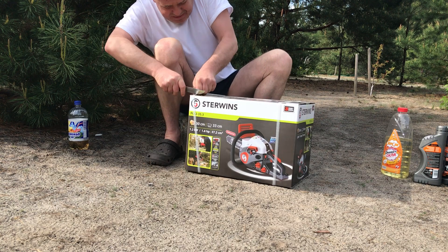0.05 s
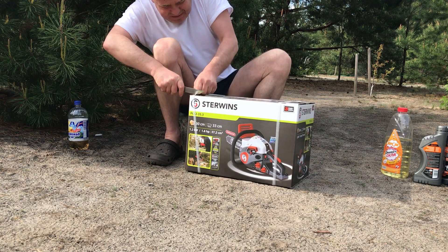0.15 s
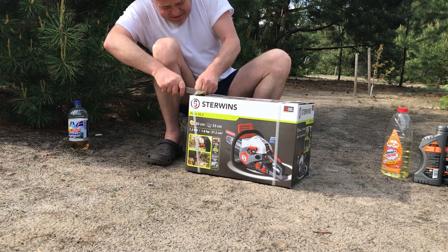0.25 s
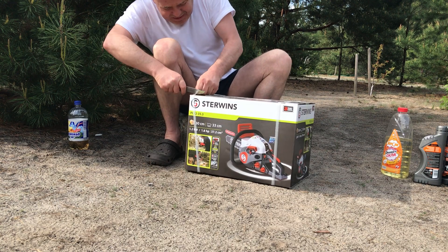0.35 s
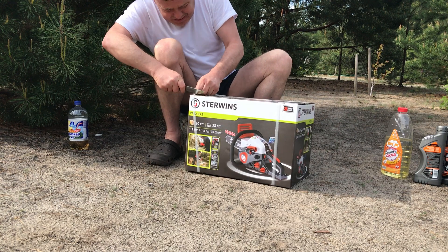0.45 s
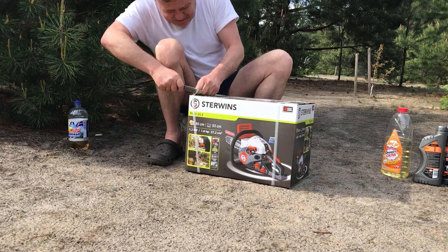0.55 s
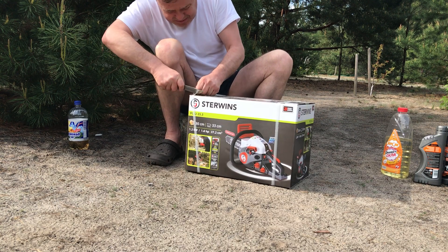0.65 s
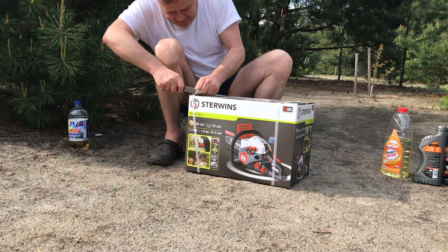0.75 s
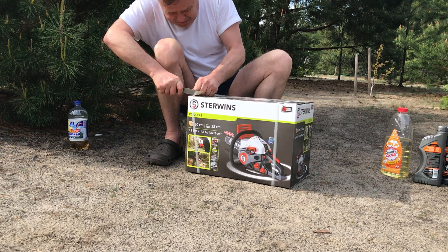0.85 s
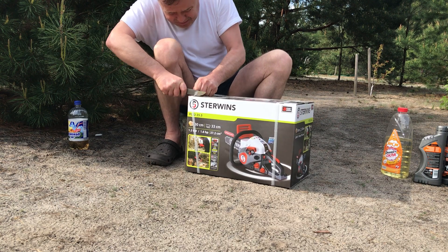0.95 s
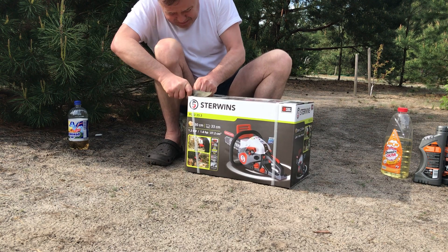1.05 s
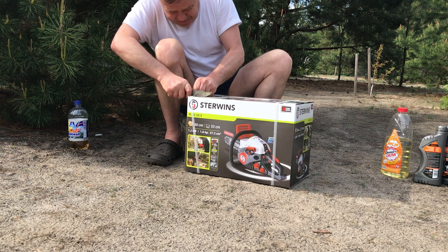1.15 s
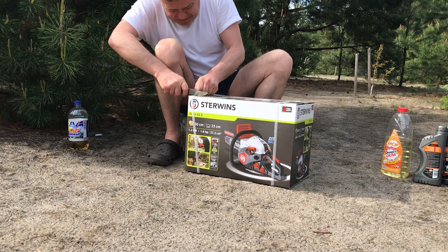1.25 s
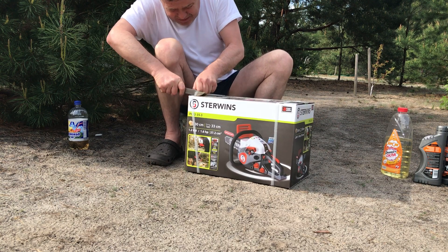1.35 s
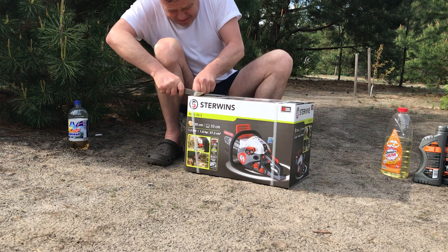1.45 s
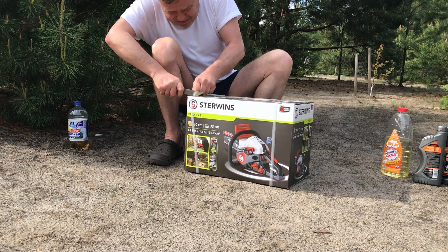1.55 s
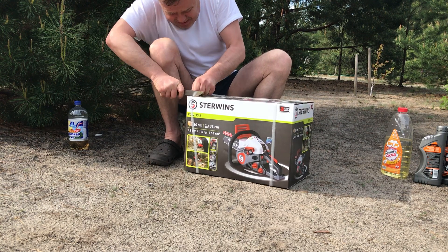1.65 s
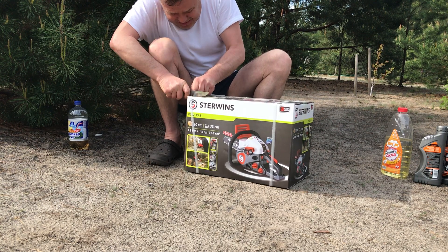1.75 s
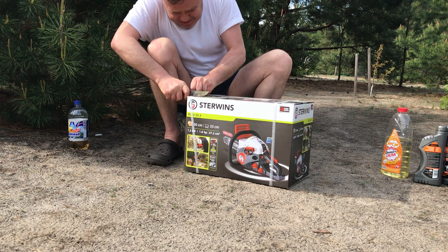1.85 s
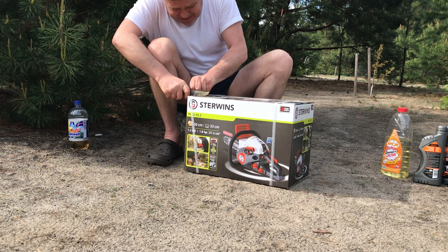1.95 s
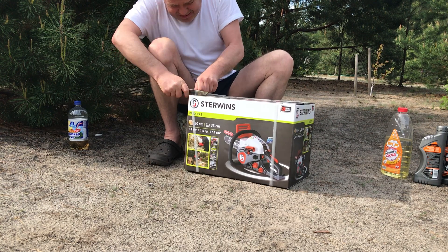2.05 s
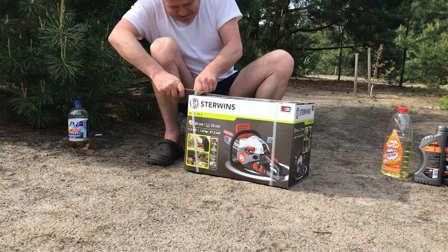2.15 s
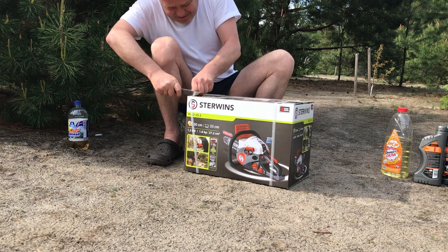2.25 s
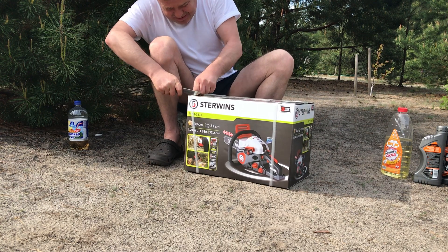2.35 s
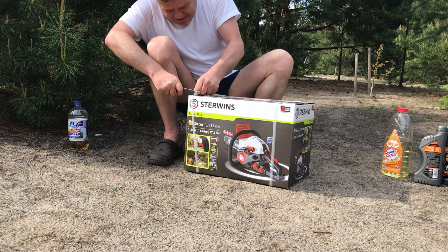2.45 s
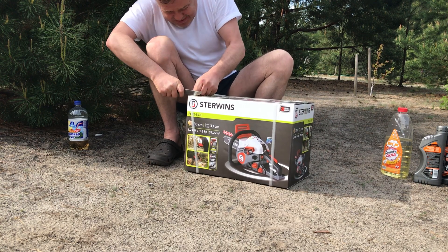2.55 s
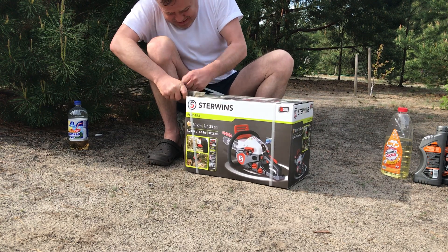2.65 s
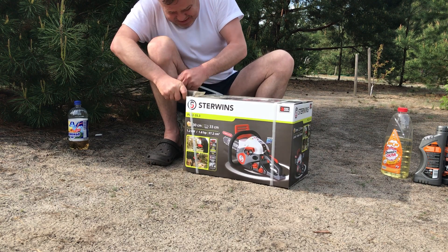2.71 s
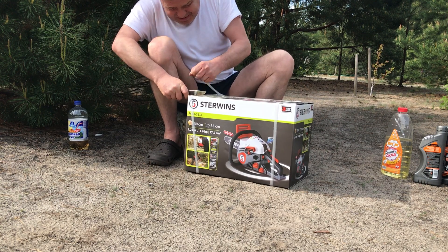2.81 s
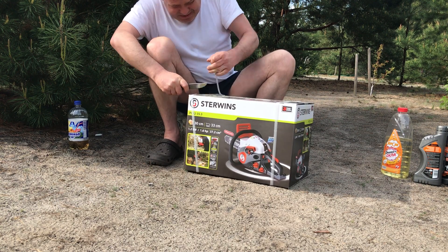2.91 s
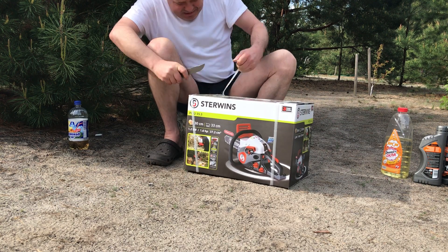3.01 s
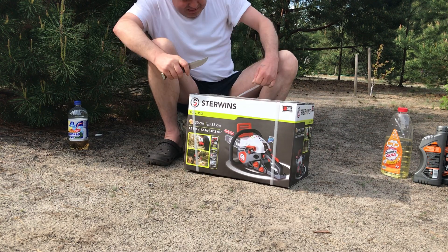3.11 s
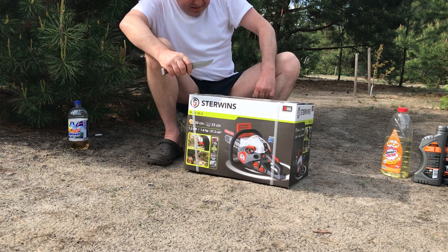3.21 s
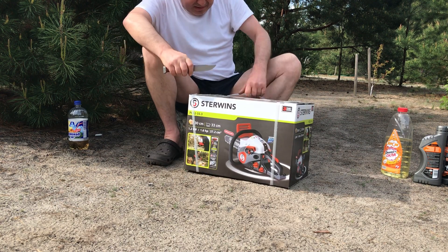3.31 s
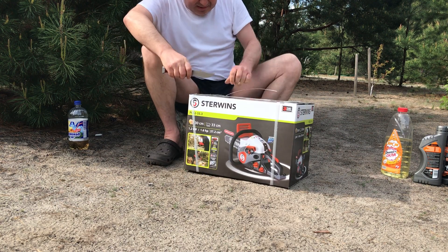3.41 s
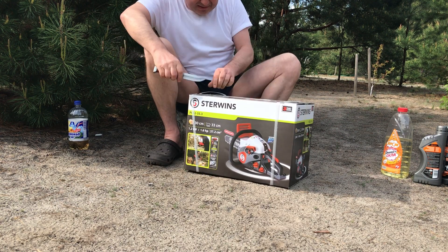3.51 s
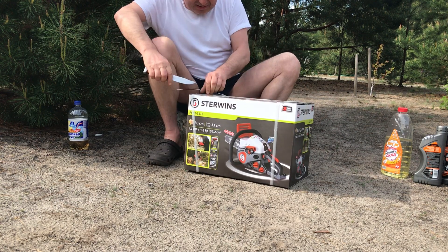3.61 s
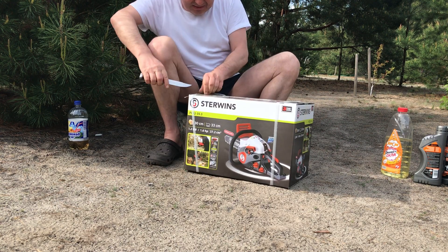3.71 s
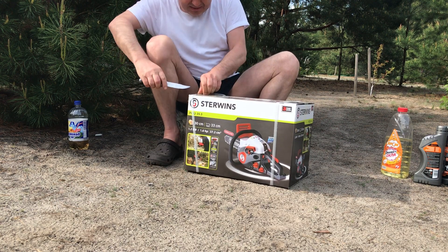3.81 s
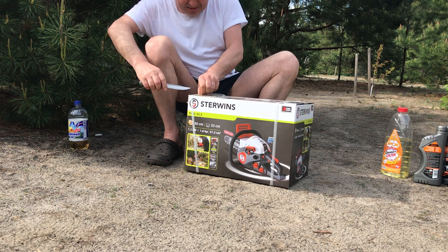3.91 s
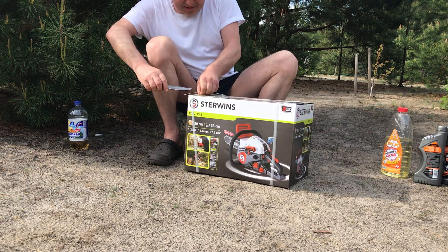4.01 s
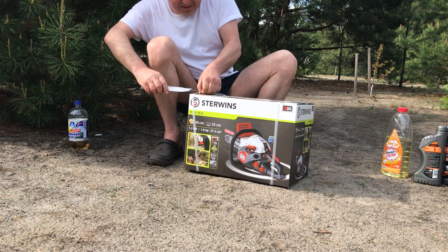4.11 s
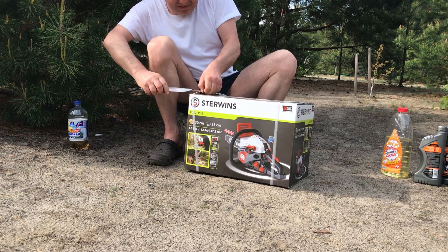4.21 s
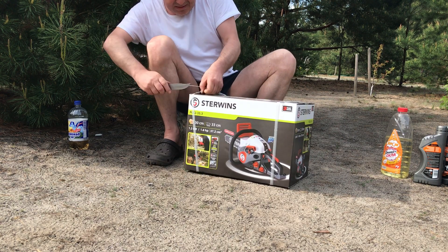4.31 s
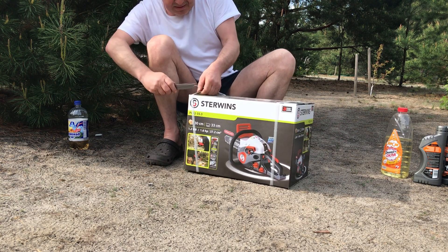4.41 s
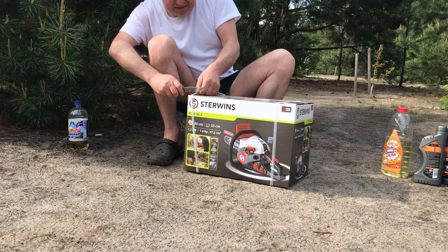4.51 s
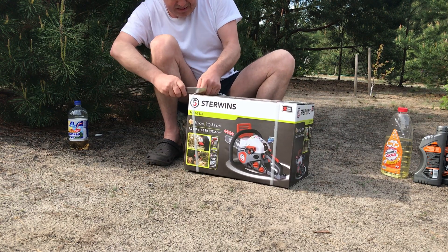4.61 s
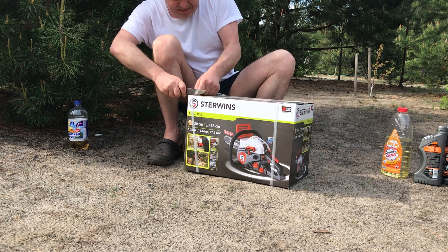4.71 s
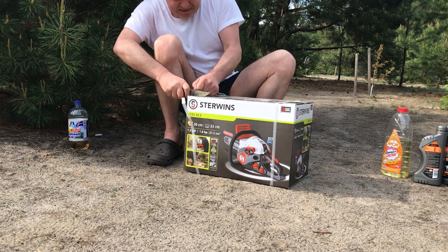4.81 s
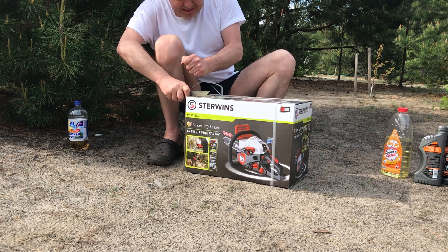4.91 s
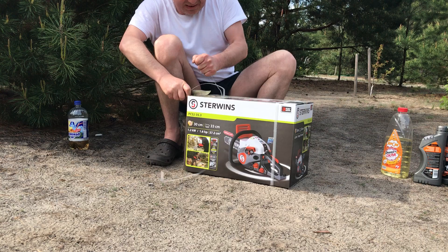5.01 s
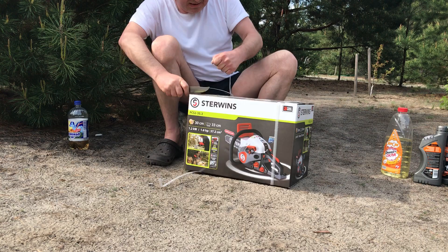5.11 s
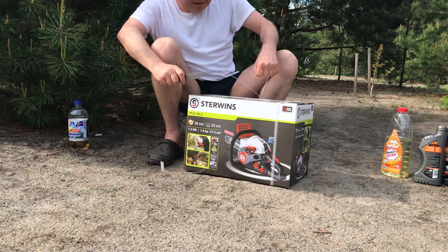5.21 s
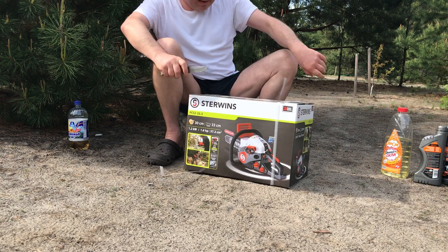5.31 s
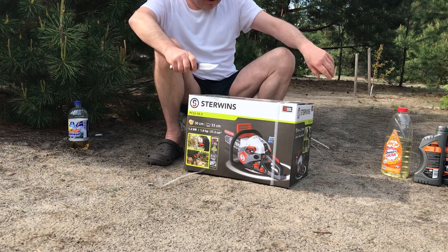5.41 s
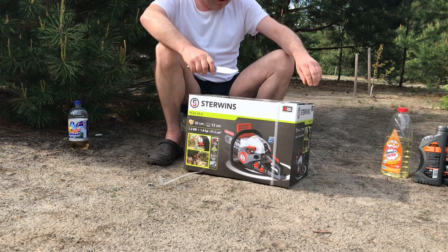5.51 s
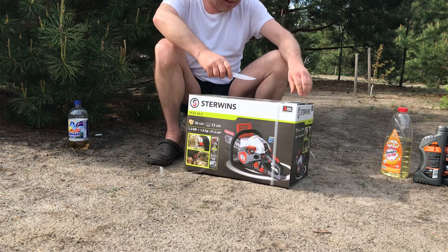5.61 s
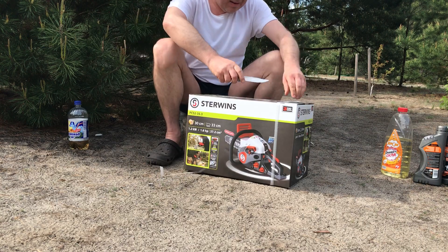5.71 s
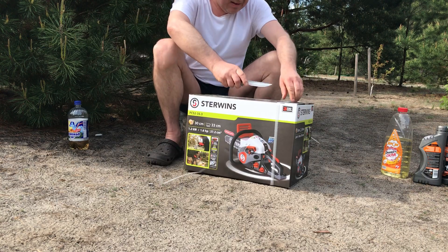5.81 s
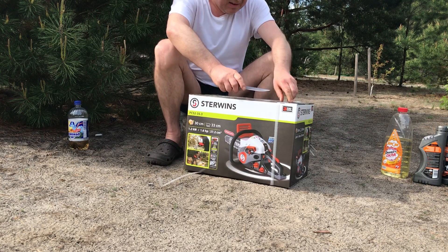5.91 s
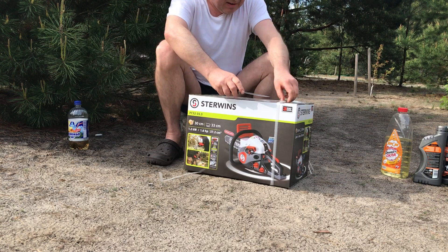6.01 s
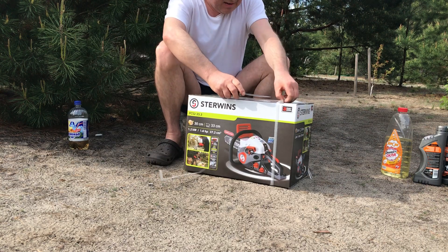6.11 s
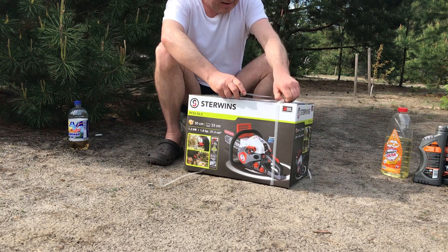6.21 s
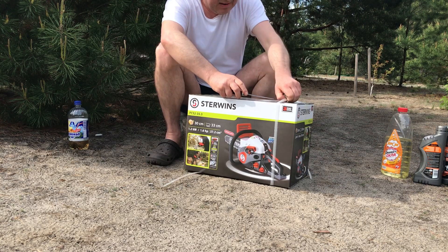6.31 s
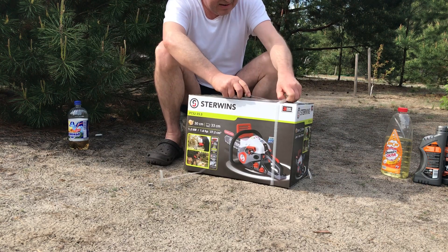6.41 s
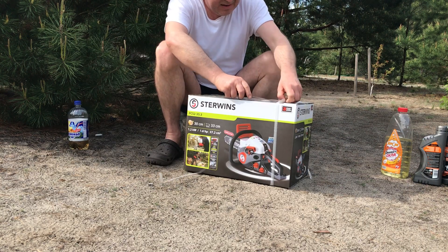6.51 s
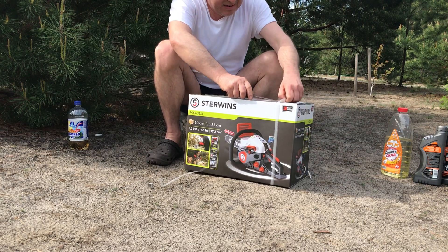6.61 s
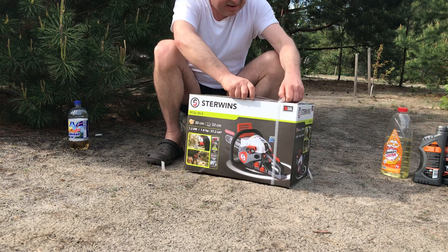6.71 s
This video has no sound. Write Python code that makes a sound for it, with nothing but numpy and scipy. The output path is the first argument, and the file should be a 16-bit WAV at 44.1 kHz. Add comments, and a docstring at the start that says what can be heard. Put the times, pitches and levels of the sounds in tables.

```python
"""A knife works under the plastic straps of a cardboard box outdoors, heard as short cracks loud and faint:
bursts of noise in card, strap and blade bands. Strap strokes scrape as rough noise with small slips.
The hollow box answers with dull knocks of decaying modes. Far off, an engine hums as narrow noise, birds
trill in falling whistles and faint narrow noises whisper. A rumble and a wash of shaped noise lie below,
and a brighter hiss rises for four stretches."""
import sys
import numpy as np
from scipy import signal
from scipy.fft import rfft, irfft
from scipy.io import wavfile
from scipy.ndimage import uniform_filter1d

SR = 44100
rng = np.random.default_rng(int(sys.argv[2]) if len(sys.argv) > 2 else 0)


def persist_wave(psi):
    """Save psi, clipped to +-1, as 16-bit WAV."""
    counts = np.round(np.clip(psi, -1, 1) * 32767).astype(np.int16)
    wavfile.write(sys.argv[1], SR, np.atleast_2d(counts).T)


N = 297675  # length in samples


def undb(db):
    """Turn decibels into an amplitude factor."""
    return 10 ** (np.asarray(db) / 20)


def unit(x):
    """Scale a signal to rms 1."""
    return x / np.sqrt(np.mean(x ** 2))


def band(x, lo_hz, hi_hz):
    """Band-pass with moderate skirts."""
    edges_hz = [lo_hz, min(hi_hz, .45 * SR)]
    return signal.sosfilt(signal.butter(2, edges_hz, "bandpass", fs=SR, output="sos"), x)


def band_noise(centre_hz, width_hz):
    """White noise narrowed to one band, at rms 1."""
    white = rng.standard_normal(N)
    return unit(band(white, centre_hz - width_hz / 2, centre_hz + width_hz / 2))


def coloured(points):
    """Noise of rms 1 whose spectrum follows (pitch_hz, level_db) points."""
    point_hz, point_db = np.transpose(points)
    hz = np.maximum(np.arange(N // 2 + 1) * SR / N, 1)
    colour_db = np.interp(np.log(hz), np.log(point_hz), point_db)
    return unit(irfft(rfft(rng.standard_normal(N)) * undb(colour_db), N))


def walk(rate):
    """Random levels drawn rate times a second and smoothed twice; rms 1."""
    hold = int(SR / rate)
    steps = np.repeat(rng.standard_normal(N // hold + 1), hold)
    return unit(uniform_filter1d(uniform_filter1d(steps, hold), hold)[:N])


def add(out, start_s, x):
    """Mix x into out from start_s."""
    i = int(start_s * SR)
    out[i:i + len(x)] += x[:len(out) - i]


WASH_DB = -64
# relative colour of the outdoor wash: pitch_hz [Hz], level_db [dB per Hz]
WASH_COLOUR = [(20, -25.5), (40, -9.5), (59, 0), (124, -6), (204, -9), (400, -18), (650, -25),
               (1350, -28.5), (2700, -29), (4200, -33), (6000, -34), (15500, -38.5)]


def wash():
    """Quiet outdoor air: shaped noise with a slight flutter in level."""
    return undb(WASH_DB + 0.25 * walk(36)) * coloured(WASH_COLOUR)


# level curve of the low rumble: time_s [s], level_db [dB]
RUMBLE_CURVE = [(0, -73), (.8, -82), (1.75, -71.5), (2.4, -80.5), (3.65, -74.5), (4.8, -70.5), (5.4, -76.5),
                (6.5, -58.5), (6.75, -61)]


def rumble():
    """Gusty low noise whose level drifts around a drawn curve."""
    level_db = np.interp(np.arange(N) / SR, *np.transpose(RUMBLE_CURVE))
    return undb(level_db + 1.6 * walk(3.3)) * band_noise(55, 40)


# tones of the far engine: pitch_hz [Hz], width_hz [Hz], level_db [dB]
ENGINE_TONES = [(55.4, 3.1, -74), (118, 15, -70.5)]


def engine():
    """Two narrow noise bands, each slowly wavering in level, make the hum."""
    out = np.zeros(N)
    for pitch_hz, width_hz, level_db in ENGINE_TONES:
        out += undb(level_db + 0.87 * walk(0.65)) * band_noise(pitch_hz, width_hz)
    return out


# stretches of louder hiss: start_s [s], end_s [s], level_db [dB]
HISS_STRETCHES = [(1.058, 1.547, -62.5), (1.789, 2.333, -64), (2.722, 3.566, -63.5), (4.946, 5.338, -63)]
# relative colour of that hiss: pitch_hz [Hz], level_db [dB per Hz]
HISS_COLOUR = [(120, -18.5), (200, -1), (530, -12.5), (900, -18.5), (4500, -19), (15800, -26)]


def loud_hiss():
    """Fluttering shaped noise that fades in and out quickly around each stretch."""
    t = np.arange(N) / SR
    flutter_db = 1.3 * walk(7) + 1.0 * walk(40)
    gain = np.zeros(N)
    for start_s, end_s, level_db in HISS_STRETCHES:
        gain += undb(level_db) * ((t > start_s) & (t < end_s))
    # 32 ms ramps
    return uniform_filter1d(gain, int(0.032 * SR)) * undb(flutter_db) * coloured(HISS_COLOUR)


# faint whispers, perhaps other birds: start_s [s], end_s [s], pitch_hz [Hz], width_hz [Hz], level_db [dB]
FAR_WHISPERS = [(5.66, 6.24, 2167, 450, -83), (5.85, 6.2, 3720, 349, -83), (6.638, 6.8, 5550, 150, -87)]


def whispers():
    """Narrow noise bands that swell, flutter and fade."""
    t = np.arange(N) / SR
    out = np.zeros(N)
    for start_s, end_s, pitch_hz, width_hz, level_db in FAR_WHISPERS:
        swell = np.sin(np.pi * np.clip((t - start_s) / (end_s - start_s), 0, 1)) ** .5
        out += undb(level_db + 2.0 * walk(40)) * swell * band_noise(pitch_hz, width_hz)
    return out


# each note falls to the end pitch from 0.55 to 1.05 times the fall above it
NOTE_END_HZ, NOTE_FALL_HZ = 3240, 560
# bird trills: start_s [s], rate_hz [notes per s], notes [count], level_db [dB, loudest note before flutter]
BIRD_TRILLS = [(.888, 47, 9, -75), (2.358, 46.5, 9, -66), (6.217, 51, 11, -68)]


def bird():
    """Quick falling whistles that swell and fade over each trill, blurred by echoes from the trees."""
    out = np.zeros(N)
    for start_s, rate_hz, notes, level_db in BIRD_TRILLS:
        place = np.arange(int(notes / rate_hz * SR)) * rate_hz / SR
        part = place % 1
        swell = np.sin(np.pi * (place / notes) ** .85)
        # louder notes start higher
        hz = NOTE_END_HZ + NOTE_FALL_HZ * (1 - part) ** 1.3 * (.55 + .5 * swell)
        note = np.sin(np.pi * part ** .7) ** .8
        whistle = np.sin(2 * np.pi * np.cumsum(hz) / SR)
        add(out, start_s, undb(level_db) * swell * note * whistle)
    t = np.arange(int(.2 * SR)) / SR
    trees = rng.standard_normal(len(t)) * undb(-37 - 60 * t / .4)
    flutter_db = 1.2 * walk(50)
    return out * undb(flutter_db) + signal.fftconvolve(out, trees)[:N]


# the box as a drum, before each knock varies it: pitch_hz [Hz], level_db [dB], t60_s [s]
BOX_MODES = [(85.6, -5, 0.085), (127.8, -1, 0.08), (181.4, -8.5, 0.058), (202.4, 1.5, 0.048),
             (265, -0.5, 0.05), (381.6, -5.5, 0.053), (510, 0.5, 0.029), (892, -14.5, 0.038)]
# blows on the box: start_s [s], peak_db [dB], centre_hz [Hz, favoured pitch], damping [times faster decay]
BOX_KNOCKS = [(0.576, -37, 80.7, 1.8), (0.578, -40.5, 510, 2), (0.622, -50.5, 130, 0.5),
              (0.828, -50, 270, 1.5), (1.08, -33.5, 192, 0.69), (1.128, -36, 185, 0.52),
              (1.195, -48, 104, 1.9), (1.793, -29, 202, 1.6), (1.835, -36, 250, 1.1),
              (1.901, -46, 222, 0.5), (2.131, -52, 133, 0.26), (2.705, -40, 266, 2),
              (2.716, -23.5, 240, 0.63), (2.74, -26.5, 127, 1.95), (2.771, -32, 209, 0.46),
              (2.841, -49, 207, 0.46), (3.082, -40.5, 230, 0.69), (3.116, -37, 383, 0.74),
              (3.147, -43.5, 240, 0.39), (3.224, -40.5, 170, 0.41), (3.256, -34, 455, 0.52),
              (3.464, -46, 139, 2.2), (3.552, -51, 272, 0.42), (3.745, -46, 160, 0.78),
              (4.257, -39, 315, 0.8), (4.462, -46.5, 277, 0.66), (4.49, -46.5, 192, 1.2),
              (4.678, -45.5, 108, 2), (4.931, -13, 210, 1.07), (5.0, -36.5, 94.5, 0.6),
              (5.039, -39, 80.7, 1.2), (5.895, -52, 151, 0.91), (6.003, -51, 400, 0.84),
              (6.024, -44.5, 186, 0.97), (6.181, -53, 200, .8), (6.35, -42.5, 188, 0.9),
              (6.394, -45, 157, 1.2), (6.51, -51, 141, 1), (6.58, -37.5, 222, 1.8), (6.598, -49, 217, 0.82)]


def knocks():
    """A blow rings the box modes; where it lands decides which modes are strong."""
    t = np.arange(int(.2 * SR)) / SR
    mode_hz, mode_db, t60_s = (c[:, None] for c in np.transpose(BOX_MODES))
    out = np.zeros(N)
    chance = rng.standard_normal((len(BOX_KNOCKS), 2, len(BOX_MODES), 1))
    for (start_s, peak_db, centre_hz, damping), (detune, scatter) in zip(BOX_KNOCKS, chance):
        # modes lose 7 dB per octave away from the favoured pitch
        weight_db = mode_db - 7 * np.abs(np.log2(mode_hz / centre_hz)) + 1.5 * scatter
        tuned_hz = mode_hz * (1 + .02 * detune)
        decay = undb(weight_db - 60 * t * damping / t60_s)
        rings = decay * np.sin(2 * np.pi * tuned_hz * t)
        # the panels take a cycle or so to get moving, so the lows come late
        attack = (1 - np.exp(-t * mode_hz / .9)) ** 2
        knock = np.sum(rings * attack, axis=0)
        add(out, start_s, undb(peak_db) * knock / np.max(np.abs(knock)))
    return out


# broad resonances of strap and lid: pitch_hz [Hz], width_hz [Hz], level_db [dB]
STRAP_RINGS = [(1275, 130, 7), (2200, 550, 6.5), (4050, 290, 2.5), (5800, 800, 5), (8036, 730, 6),
               (13300, 6300, 5)]


def ringing(x):
    """The sound plus what each resonance of strap and lid adds to it."""
    out = x.copy()
    for pitch_hz, width_hz, level_db in STRAP_RINGS:
        peak = signal.iirpeak(pitch_hz, pitch_hz / width_hz, fs=SR)
        out += (undb(level_db) - 1) * signal.lfilter(*peak, x)
    return out


# bands of card, strap and blade, in that order: low_hz [Hz], high_hz [Hz]
PART_BANDS = [(550, 1600), (1600, 5000), (5000, 15500)]


def radiated(grain_db):
    """Card, strap and blade each carry one band of ringing noise; all follow the same grain."""
    parts = []
    for low_hz, high_hz in PART_BANDS:
        grains = rng.standard_normal(N) * undb(grain_db)
        parts.append(unit(band(ringing(grains), low_hz, high_hz)))
    return np.array(parts)


STROKE_RISE, STROKE_FALL = .2, 0.41  # shares of the stroke
# strokes of strap over card: start_s [s], length_s [s], level_db [dB], treble_db [dB relative to level_db]
STROKES = [(.1, 0.58, -82.5, -9), (0.993, 0.082, -74.5, 3), (1.078, 0.094, -66.5, 4),
           (1.302, 0.14, -70.5, 0), (1.788, 0.11, -68.5, 7.5), (2.707, 0.056, -38.5, -1.5),
           (2.748, 0.077, -63.5, -3), (3.071, 0.13, -49, 1), (3.181, 0.12, -47.5, 2),
           (3.388, 0.1, -67.5, -4), (4.649, 0.034, -70.5, -1.5), (4.87, 0.1, -65.5, -11.5),
           (4.934, .04, -54, -8), (4.965, 0.097, -54.5, -7), (5.989, 0.091, -71, -9), (6.124, 0.13, -74, 1)]


def stroke(t):
    """Level and treble gains of the strokes at times t: each stroke rises, holds and falls."""
    start_s, length_s, level_db, treble_db = (c[:, None] for c in np.transpose(STROKES))
    place = (t - start_s) / length_s
    shape = np.clip(np.minimum(place / STROKE_RISE, (1 - place) / STROKE_FALL), 0, 1)
    gain = undb(level_db) * shape
    return gain.sum(axis=0), (gain * undb(treble_db)).sum(axis=0)


def drag():
    """A strap scrapes as dense stick-slip noise whose strength jumps from moment to moment."""
    level, treble = stroke(np.arange(N) / SR)
    card, strap, blade = radiated(2.0 * walk(300))
    return level * undb(-4.5) * (card + strap) + treble * blade


SLIPS_PER_S, SLIP_T60_MS = 150, 18
# card, strap and blade relative to the stroke, and their random spread
SLIP_DB, SLIP_SCATTER_DB = (-12.5, 1, 5), 4.5


def slips():
    """A sliding strap slips in small cracks at uneven moments; rows have the columns of BURSTS."""
    count = int(SLIPS_PER_S * N / SR)
    place, scatter = rng.random(count), rng.standard_normal((count, 3))
    time_s = (np.arange(count) + place) / SLIPS_PER_S
    level, treble = stroke(time_s)
    on = level > 0
    stroke_db = 20 * np.log10(np.transpose([level, level, treble])[on])
    parts_db = stroke_db + SLIP_DB + SLIP_SCATTER_DB * scatter[on]
    return [(s, *db, 0, SLIP_T60_MS) for s, db in zip(time_s[on], parts_db)]


BLADE_TOP_HZ = 10500  # the lift acts above this
# short noise bursts, loud and faint, some a soft lead-in just before a loud crack:
# time_s [s, 0.4 ms after the onset], card_db [dB], strap_db [dB], blade_db [dB],
# lift_db [dB, blade's top before levelling], t60_ms [ms, blade; at least 2 is used]
BURSTS = [(0.084, -53, -73, -60, 0, 6.9), (0.2496, -59, -71, -70, 0, 7.3), (0.5708, -61, -55, -53, 5, 49),
          (0.5776, -38.5, -34.5, -37, 11, 6.7), (0.6105, -72, -60.5, -55.5, 2, 52),
          (0.8307, -68, -45.5, -36, 6, 10.8), (0.869, -61, -72, -65, -4, 18),
          (0.9245, -56.5, -46.5, -33, 8.5, 14.6), (0.9504, -76, -57, -54, 0, 12),
          (0.975, -70, -60, -66, 0, 22), (1.078, -63, -52.5, -50, 4, 27),
          (1.0832, -35, -32.5, -20.5, -4, 15), (1.129, -40, -27, -21, 4.5, 15),
          (1.1375, -48, -35.5, -27, 5, 13), (1.213, -70, -61, -57, 0, 14),
          (1.2344, -66, -50.5, -62, -6, 13), (1.4856, -62, -55.5, -51, -14, 26),
          (1.7674, -49, -54, -39, -5, 17), (1.7755, -51, -54, -37, -1, 19),
          (1.7835, -34, -26.5, -20, -1, 12.4), (1.7931, -34.5, -27, -14, 11, 12.4),
          (1.8184, -49, -50, -32, 0, 8.7), (1.8318, -54, -42.5, -41, 0, 28),
          (1.8349, -31, -24.5, -13.5, 1.5, 9.2), (1.9031, -51, -29, -24.5, -6, 9.8),
          (1.9216, -61, -42.5, -39, -6, 16), (1.9364, -59, -47, -50, 11, 11),
          (1.952, -70, -52, -52, 15, 16), (1.9819, -67, -46, -45, 17, 6.4),
          (1.988, -76, -46.5, -43, 24, 10.5), (2.012, -65.5, -47.5, -51, 11, 11),
          (2.6831, -54, -48.5, -46.5, -1, 32), (2.694, -49, -47, -36.5, -1, 23.5),
          (2.7044, -32, -26.5, -22, 2, 13), (2.7154, -52, -17, -26, 2, 12.8),
          (2.7214, -39, -32, -19, -3, 11), (2.7236, -21, -17.5, -18, -1, 14),
          (2.7413, -40, -35, -33, 2, 19), (2.7557, -63, -38.5, -42, 6, 68),
          (2.7676, -43, -37, -30.5, 0, 19), (2.7717, -25.5, -34, -21.5, 0, 8),
          (2.776, -28.5, -29, -20, 9, 13.7), (2.7974, -34, -31, -30, 0, 9.9),
          (2.9033, -66, -48.5, -51, 2, 5), (3.0757, -46, -38, -35, 0, 26), (3.095, -59, -50, -40, 2, 7.5),
          (3.1, -40, -38, -33, -2, 7.9), (3.104, -37, -38, -34, -4, 14),
          (3.1166, -40, -36, -26.5, -5, 15.4), (3.1304, -57, -43, -33, 4, 20),
          (3.1457, -55, -47, -37, 0, 20), (3.149, -41, -39, -26.5, 0, 11), (3.1615, -57, -47, -29, -6, 26),
          (3.187, -65, -37, -27, -4, 19), (3.1968, -64, -36.5, -29.5, -10, 48),
          (3.2106, -57, -34.5, -30, 2, 34), (3.2151, -45, -48, -30, -3, 12),
          (3.2223, -50, -40, -29.5, 0, 43), (3.2396, -45, -42, -35, -2, 49),
          (3.2485, -34, -27.5, -29, -1, 12.5), (3.2607, -34, -35.5, -31, -3, 29),
          (3.2704, -56, -59, -32.5, -9, 18), (3.371, -56, -57.5, -52, -10, 31),
          (3.5543, -61, -54.5, -71, 0, 30), (3.6165, -62, -56.5, -56, 1.5, 24),
          (3.6382, -74, -70, -56, 3, 9), (3.991, -73.5, -76, -35.5, 8, 11),
          (4.0374, -67.5, -59.5, -56.5, -4.5, 31), (4.2464, -76, -42.5, -53, -1, 12.5),
          (4.2608, -48.5, -47, -43, 0, 25), (4.2922, -70, -62.5, -49.5, 4, 10.4),
          (4.4888, -55, -50, -32, -3, 11.7), (4.5406, -73, -54, -50, -0.5, 12),
          (4.5495, -68.5, -61.5, -58.5, 0, 23), (4.684, -67, -59.5, -59.5, -2, 13),
          (4.9293, -23.5, -22, -17, 2.5, 26), (4.9303, -25, -16.5, -20.5, 4, 13),
          (5.0034, -46, -62, -55, 0, 22), (5.0124, -48.5, -64, -43.5, 0, 43),
          (5.0347, -50, -64, -46, 0, 18), (5.152, -73, -61.5, -57.5, -3, 62),
          (5.3698, -70, -53.5, -53, -3.5, 18), (5.4493, -52, -61.5, -60.5, 0, 8.3),
          (5.4592, -60.5, -67, -68, 0.5, 16.5), (5.9761, -63.5, -53, -54.5, 1, 16.7),
          (5.9982, -54, -52, -49, 2, 13), (6.0067, -58.5, -40, -54, -4, 12),
          (6.026, -57, -64.5, -59, 0, 27), (6.0558, -61.5, -63.5, -69, 0.5, 25),
          (6.15, -66.5, -57, -51, -1.5, 12), (6.1822, -57, -56, -27.5, -8, 8.6),
          (6.354, -43, -43.5, -48.5, 0.5, 13.2), (6.3943, -60, -57.5, -62.5, 0, 19),
          (6.428, -56.5, -58.5, -65.5, 0, 12), (6.5254, -66, -66, -50.5, 5.5, 24),
          (6.58, -50, -53, -67, -1, 28), (6.5867, -47, -55.5, -67.5, 0, 6.3),
          (6.6004, -64, -61, -63.5, 0, 26)]


def cracks():
    """Each burst is noise grains under a quick rise, a fall of its own length and a weak extra tail."""
    t = np.arange(int(.08 * SR)) / SR
    # card, strap, blade: the larger parts start more slowly and last longer
    rise_s, stretch = np.array([[.001], [.0004], [.0002]]), np.array([[1.6], [1.2], [1.]])
    breaks = np.pad(radiated(3.0 * walk(1500)), ((0, 0), (0, len(t))), mode="wrap")
    highpass = signal.butter(2, BLADE_TOP_HZ, "highpass", fs=SR, output="sos")
    blade_top = signal.sosfiltfilt(highpass, breaks[2])
    out = np.zeros(N)
    for time_s, *parts_db, lift_db, t60_ms in BURSTS + slips():
        fall = undb(-60 * t / (stretch * max(t60_ms, 2) / 1000))
        tail = undb(-34.0 - 60 * t / 0.014)
        shape = (1 - np.exp(-t / rise_s)) * (fall + tail)
        # a very brief lift sharpens the front of the burst
        shape = shape * (1 + 0.35 * np.exp(-t / 0.00012))
        start_s = time_s - .0004
        i = int(start_s * SR)
        burst = shape * breaks[:, i:i + len(t)]
        burst[2] += (undb(lift_db) - 1) * shape[2] * blade_top[i:i + len(t)]
        # the table sets the energy of each band, chance only its fine grain
        burst *= np.sqrt(np.sum(shape ** 2, axis=1) / np.sum(burst ** 2, axis=1))[:, None]
        add(out, start_s, undb(parts_db) @ burst)
    return out


def scene():
    """Mix the background, the birds, the box and the knife into one channel."""
    background = wash() + rumble() + engine() + loud_hiss() + whispers() + bird()
    return (background + knocks() + drag() + cracks())[None]


CASE_ECHO_MS, CASE_ECHO_DB, TOP_HZ = .39, -13, 15800


def record(dry):
    """An inverted echo inside the phone's case dents the treble; the deepest bass and the top are cut."""
    echo = np.roll(dry, round(CASE_ECHO_MS * SR / 1000), axis=1)
    cased = dry - undb(CASE_ECHO_DB) * echo
    cased = signal.sosfilt(signal.butter(2, 45, "highpass", fs=SR, output="sos"), cased)
    return signal.sosfilt(signal.ellip(10, .2, 70, TOP_HZ, fs=SR, output="sos"), cased)


dry = scene()
out = record(dry)
persist_wave(out)
```